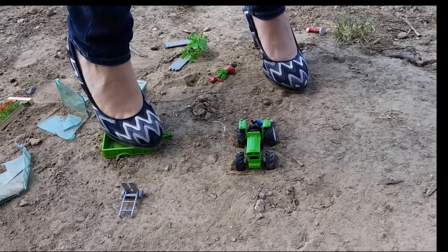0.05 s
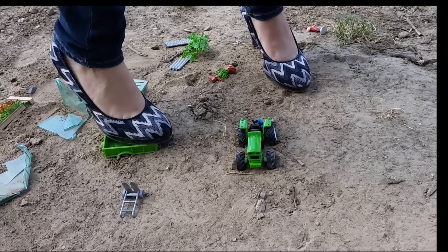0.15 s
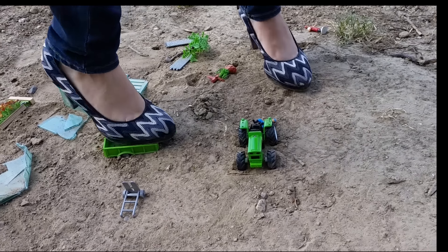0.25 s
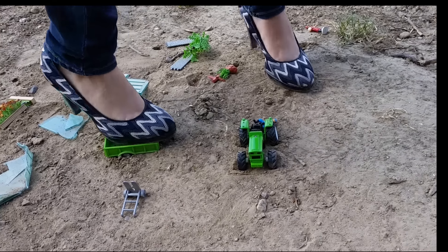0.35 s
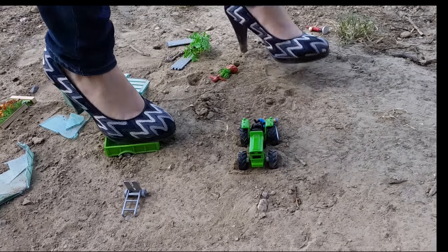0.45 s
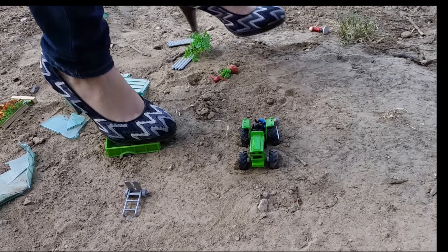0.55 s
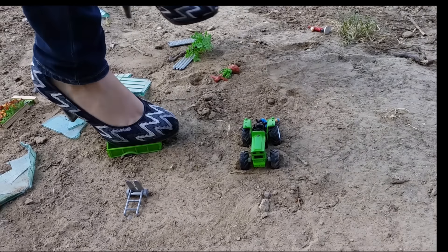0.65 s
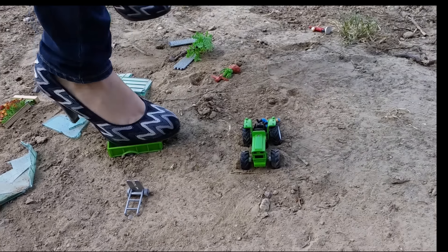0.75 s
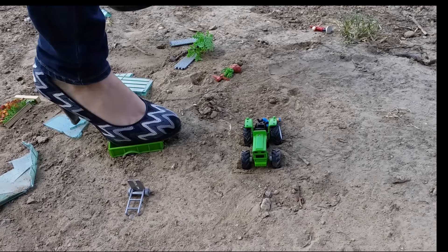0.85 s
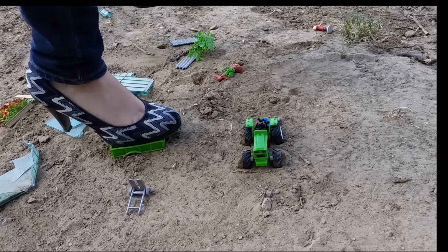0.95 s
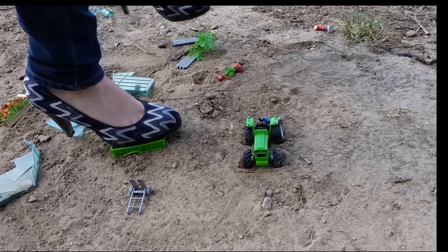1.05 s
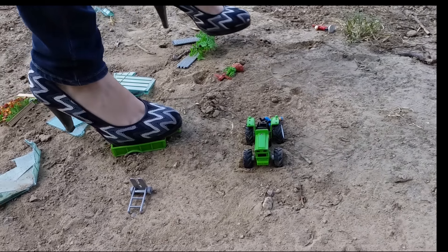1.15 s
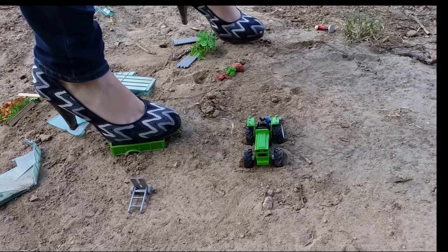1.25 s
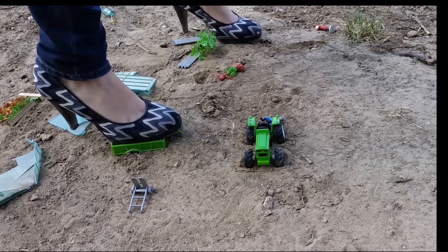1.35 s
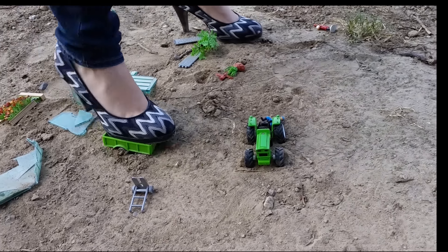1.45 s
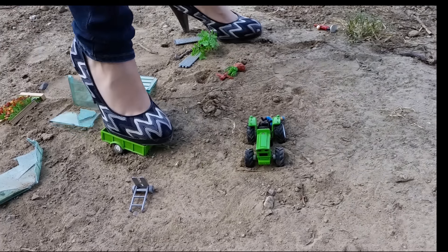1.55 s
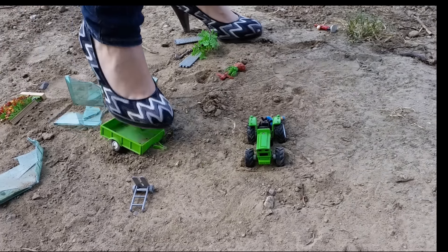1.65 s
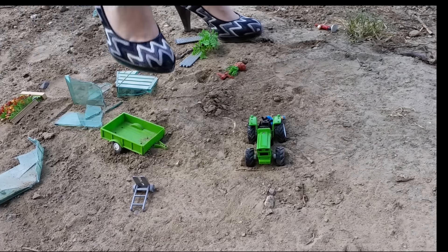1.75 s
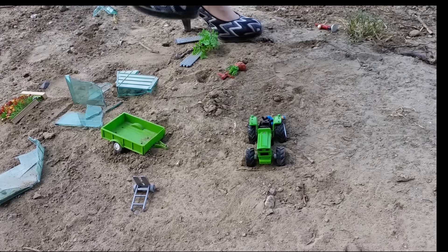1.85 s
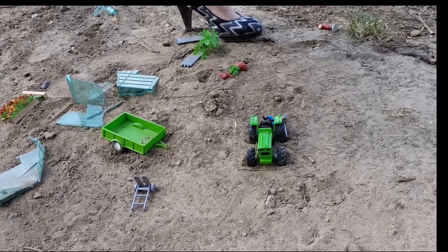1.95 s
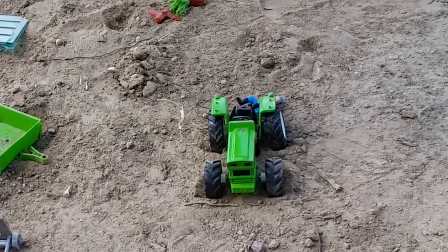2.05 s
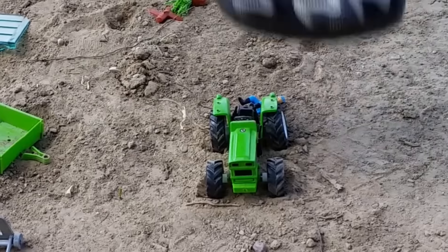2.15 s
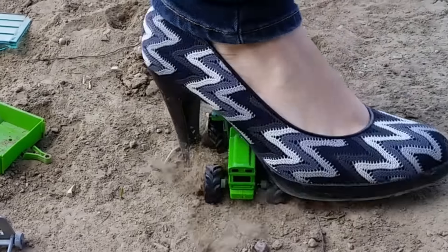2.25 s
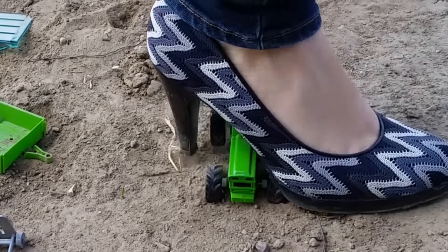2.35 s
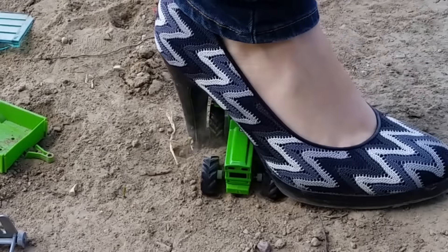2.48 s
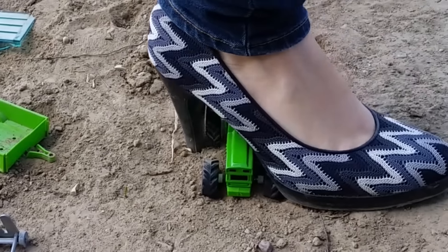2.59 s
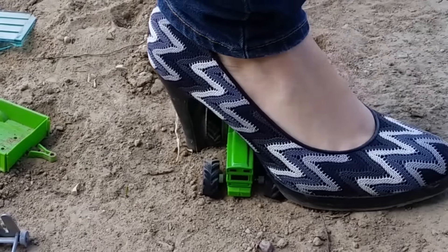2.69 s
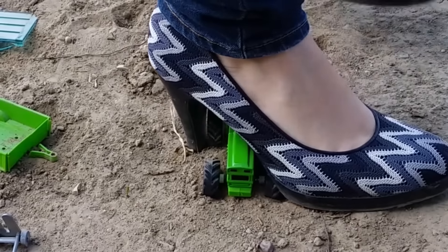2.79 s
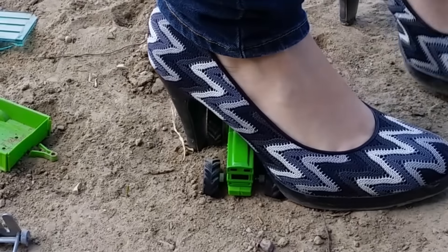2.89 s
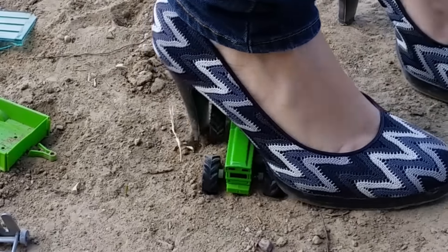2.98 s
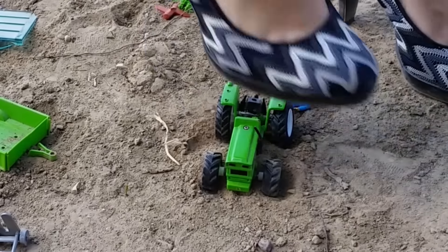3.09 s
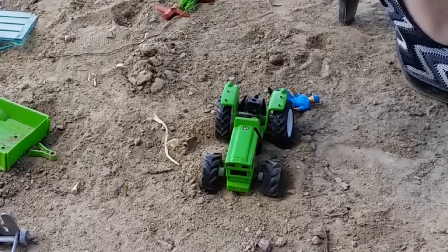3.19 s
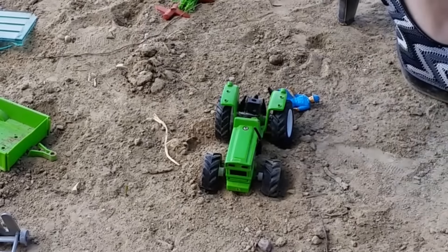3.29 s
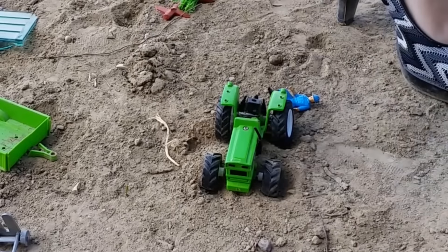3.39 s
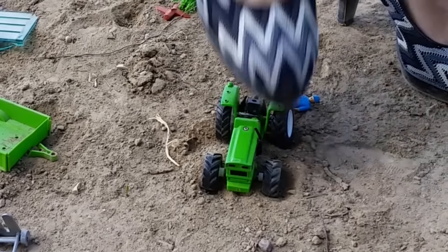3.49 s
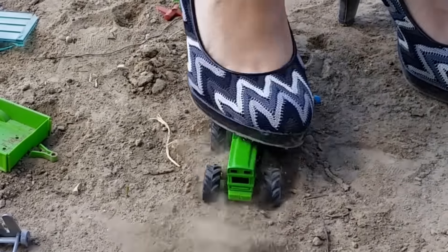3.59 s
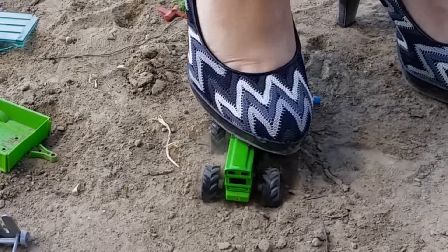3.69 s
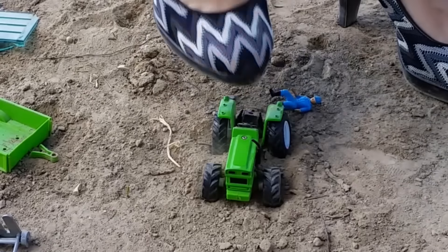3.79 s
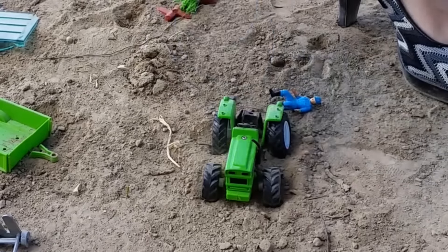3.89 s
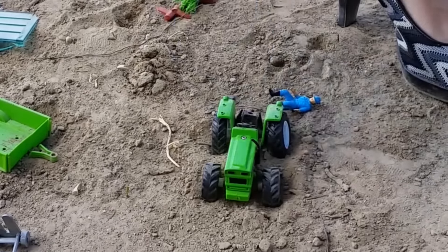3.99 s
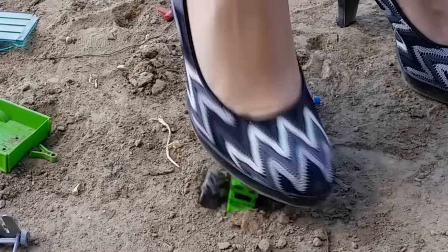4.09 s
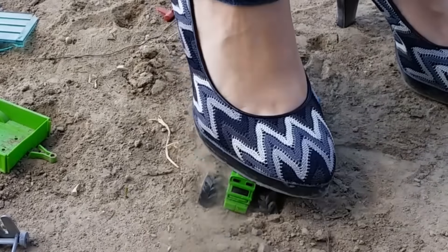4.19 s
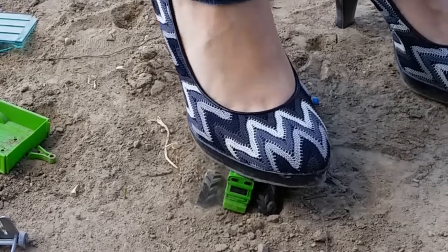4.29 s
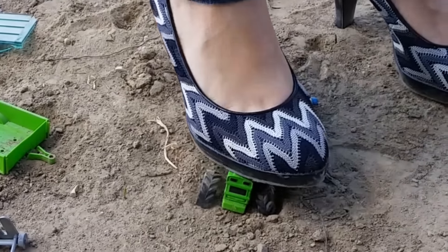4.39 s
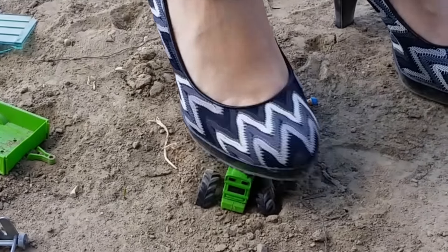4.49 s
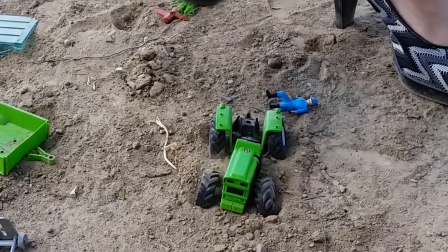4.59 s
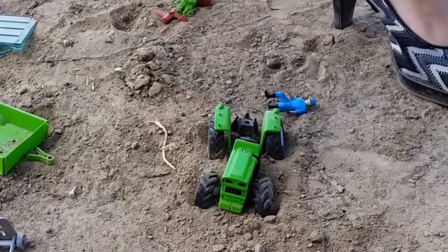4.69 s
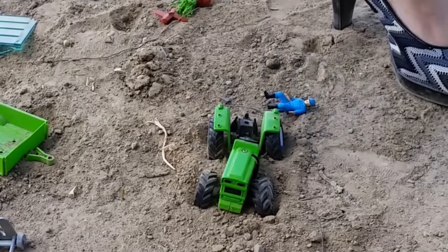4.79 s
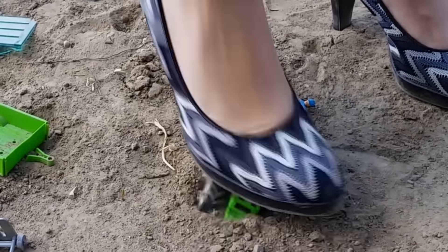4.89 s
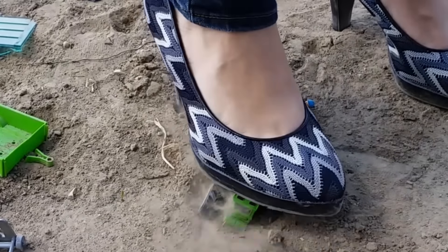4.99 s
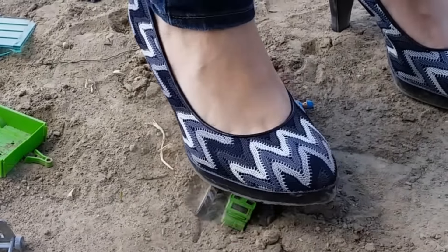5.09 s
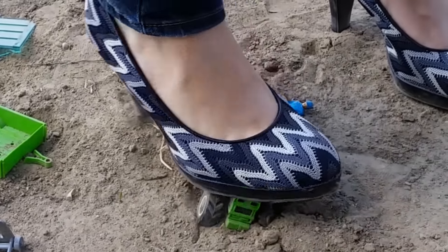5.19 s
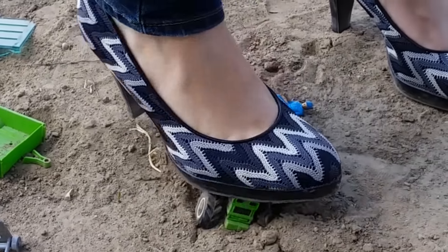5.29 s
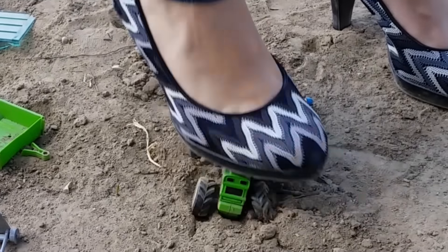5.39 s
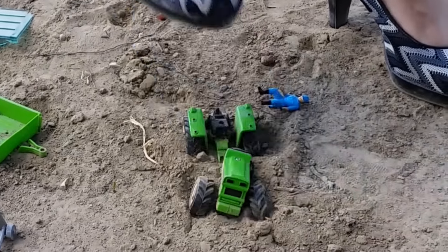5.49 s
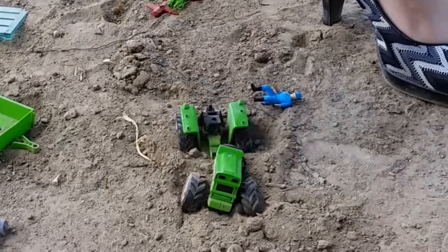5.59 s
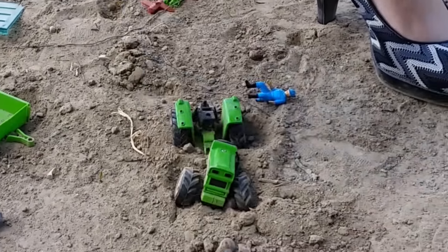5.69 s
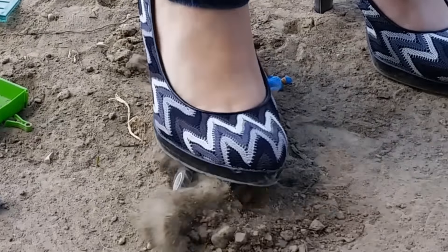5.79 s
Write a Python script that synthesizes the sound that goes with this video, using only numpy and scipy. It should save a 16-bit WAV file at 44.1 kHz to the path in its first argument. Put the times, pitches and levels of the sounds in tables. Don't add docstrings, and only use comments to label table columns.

```python
import sys
import numpy as np
from scipy import signal
from scipy.io import wavfile
from scipy.ndimage import uniform_filter1d

SR = 44100
rng = np.random.default_rng(int(sys.argv[2]) if len(sys.argv) > 2 else 0)


def field_ratio(decibels):
    return 10 ** (np.asarray(decibels, dtype=float) / 20)


def digitize_waveform(pressure):
    field = np.atleast_2d(pressure).T
    bounded = np.clip(field, -1, 1)
    quanta = np.round(bounded * 32767).astype(np.int16)
    wavfile.write(sys.argv[1], SR, quanta)


N = 257720

# t/s, peak level/dB, f/Hz, t60/s, knock of the sole/dB
STAMPS = [
    (1.6, -13.5, 170, 0.021, -35.5),
    (1.735, -53, 266, 0.034, -32),
    (2.322, -20.5, 350, 0.025, -18),
    (2.334, -9.5, 260, 0.033, -23),
    (3.0246, -9, 203, 0.023, -47),
    (3.629, -14.5, 159, 0.027, -17),
    (3.642, -26, 382, 0.065, -28),
    (4.2148, -7, 162.4, 0.027, -19.5),
    (5.016, -18.5, 158, 0.038, -28.5),
    (5.029, -23.5, 120, 0.061, -62),
]
# f/Hz, width/Hz, level/dB
SOLE_MODES = [(440, 140, -1.5), (673, 50, -8)]
# t/s, peak level/dB, f/Hz, t60/s
BLOWS = [(.689, -32.5, 1340, 0.028), (.999, -41, 1300, 0.061), (1.008, -40, 1300, .07),
         (1.0302, -34, 1300, 0.043), (1.043, -33, 1350, .04), (1.059, -35, 306, .025),
         (1.392, -38, 240, 0.03), (1.504, -41, 1270, .04), (1.522, -39, 1140, 0.071),
         (2.3295, -24.5, 870, 0.033), (2.355, -31.5, 1270, 0.023), (3.6294, -16, 737, 0.0087),
         (3.6335, -23.5, 940, 0.012), (3.643, -19, 520, .022), (3.651, -22.5, 270, 0.043),
         (4.2154, -15.5, 930, 0.0051), (4.2205, -25.5, 800, 0.011), (4.2277, -22, 1340, 0.0053),
         (4.282, -32, 600, 0.025), (3.1378, -27.5, 1810, 0.018), (3.1385, -31, 2400, .013),
         (3.1374, -26.5, 3030, 0.012), (2.8, -36, 1830, 0.012), (1.7345, -33, 1700, 0.016),
         (1.742, -29, 2380, .02), (3.9, -57, 900, 0.019), (4.2352, -27, 1100, 0.011),
         (1.0305, -38, 2200, .025), (3.630, -24, 1840, 0.035), (2.3245, -20, 1780, .012),
         (5.0165, -26, 767, 0.019), (5.0188, -23, 486, 0.025)]
# t/s, level/dB, shard f/Hz, body over shard/dB, length/ms
CRUNCHES = [(0.2038, -55, 6450, -8, 1.9), (0.2161, -50, 6900, 0, 3.7), (0.6767, -47.5, 2500, 1.5, 4.9),
            (0.688, -47.5, 5900, -4, 3.3), (1.103, -54.5, 2930, 5.5, 1.8), (1.1084, -53, 2670, -2, 1.4),
            (1.1117, -54, 6540, -7, 3), (1.362, -59.5, 2450, -2, 4.5), (1.65, -57, 2400, 4, 6.4),
            (1.7065, -57, 2070, 13.5, 12), (1.889, -57.5, 2420, -14, 4.4), (3.813, -67, 8000, -5, 2.2),
            (4.227, -32.5, 1820, -5, 3.3), (4.2349, -24.5, 3180, -12.5, 2.4), (4.471, -77, 1940, -5, 1.8),
            (4.5651, -66.5, 5350, -3.5, 2.8), (5.0247, -43.5, 3580, -14, 2.4),
            (5.047, -52.5, 5320, -17, 1.8)]
SNAPS = [(1.0283, -47.5, 4060, 17.5, 2.5), (1.045, -50, 3200, -15, 9.4), (1.08, -61, 3320, 10, 9.6),
         (1.1179, -49.5, 2700, -2, 2.2), (1.5041, -57, 2240, 6, 14), (1.7328, -41, 2020, 6, 6.5),
         (1.742, -34.5, 2380, 0, 6), (2.3337, -28.5, 1780, -4.5, 7), (2.336, -26.5, 2710, -24, 3.4),
         (2.5974, -56, 2420, -4, 3.2), (2.665, -51, 1840, -8, 6), (3.0248, -41.5, 2670, -3.5, 2.7),
         (3.6283, -25, 1860, -1.5, 5.7), (3.6406, -25.5, 1840, -29, 2.3), (3.646, -26.5, 4620, -11, 2.3),
         (3.675, -35, 3470, -9.5, 2.3), (3.7814, -52.5, 3550, -0.5, 4), (3.848, -58.5, 3800, 3.5, 6.1),
         (4.2154, -28.5, 2300, 2, 2.07), (4.221, -30, 2310, -17, 3.3), (4.619, -47.5, 4180, -25, 8.5),
         (4.646, -47.5, 5170, -25, 2.4), (5.0169, -43, 1850, 0.5, 4.3), (5.2716, -72, 7300, -1.5, 6)]
CLICKS = [(1.03, -39, 2610, 2, 7), (1.307, -48, 2605, -20, 17), (1.755, -46, 2000, -9, 4),
          (1.8165, -44, 3400, -25, 0.85), (2.3156, -37, 4130, -21, 5.7), (2.3251, -26.5, 1910, 2, 1.57),
          (2.3271, -30, 2010, 4, 5.2), (2.5026, -52.5, 2370, -4, 1.4), (2.5426, -51, 2470, 0, 1.4),
          (3.1356, -43, 2380, -22, 1.8), (3.6423, -29, 4050, -6, 1.8)]
# fizz over shard/dB, share of unringing crack
BREAK_KINDS = [
    (2.5, 0.43),
    (-5, 0.39),
    (-20.0, 0.15),
]
# f/Hz, width/Hz, level/dB
TOY_MODES = [(923, 190, -10.5), (1280, 93, 0), (1728, 91, 0)]
# t/s, level/dB, first f/Hz, second f/Hz, length/ms
CHIPS = [(.2175, -42, 10300, 6350, 4), (.678, -48, 6300, 12500, 7.7), (.6885, -39, 6300, 12700, 4.6),
         (1.082, -54, 12000, 14500, 3), (1.103, -52, 13500, 6300, 2), (1.1075, -49, 14500, 11000, 2.5),
         (1.1125, -52, 14500, 6300, 2.5), (1.118, -55, 14000, 6500, 3), (1.571, -54, 13500, 6900, 57),
         (1.613, -44, 14500, 12000, 11), (1.65, -52, 14600, 11500, 4), (1.707, -54, 11000, 14000, 2.2),
         (1.7355, -37, 11000, 13000, 3.5), (1.7425, -44, 14500, 11000, 4), (1.753, -44, 11000, 14000, 5),
         (1.817, -48, 13000, 3320, 3.4), (1.866, -58, 11000, 14100, 3), (2.406, -51, 8000, 12000, 3),
         (2.514, -59, 6500, 4500, 2.2), (2.541, -57, 7600, 9500, 3), (2.571, -56, 7500, 9900, 4.3),
         (2.66, -62, 10000, 13500, 2.7), (2.866, -62.5, 13500, 10600, 3), (3.131, -59, 7900, 3100, 3),
         (3.144, -57, 7800, 7400, 3), (3.642, -30.5, 11800, 7900, 7.4), (3.782, -54, 15000, 13000, 2.2),
         (3.813, -46.5, 7950, 11600, 3.7), (3.845, -61, 7350, 12000, 21), (4.621, -47.5, 9340, 7340, 8.6),
         (4.622, -54.5, 5500, 13000, 10), (1.305, -54, 14400, 6450, 14), (4.2349, -32.5, 7400, 9800, 3.2),
         (4.2215, -38, 9480, 12000, 2.5), (4.2155, -39.5, 7500, 9500, 2.5), (4.646, -46, 7230, 5440, 3.4)]
# t/s, level/dB, f/Hz, t60/s, left over right/dB
RINGS = [(1.43, -35, 485, 0.038, 1), (1.5, -43, 474, 0.092, -1), (1.755, -42.5, 1383, 0.14, -25),
         (1.69, -42.5, 256.8, 0.47, 21), (4.272, -41.5, 592, 0.044, 5.5), (4.595, -55.5, 454, 0.088, 2.5),
         (5.26, -41.5, 334, 0.044, 0.5)]
# t/s, level/dB
DRAGS = [
    [(.96, -67), (1.01, -50), (1.024, -50), (1.033, -46), (1.05, -38), (1.062, -68)],
    [(1.49, -58), (1.505, -55), (1.518, -53), (1.535, -41), (1.58, -35), (1.595, -38), (1.62, -42.5),
     (1.645, -52)],
]
# f/Hz, width/Hz, level/dB
TRAILER_MODES = [(700, 310, 0.5), (1226, 80, 11), (1380, 120, -2), (1850, 180, -10), (2370, 140, -0.5),
                 (3080, 160, -11)]
# t/s, rise/s, grit level/dB, fizz over grit/dB, t60/s
SAND = [(.12, 0.055, -64, -1, 1.6), (.29, 0.067, -74, 2, 1.3), (.635, 0.012, -66, -2, 0.94),
        (.73, 0.0089, -63.5, -2, 0.45), (1.025, 0.0026, -48.5, -4.5, 0.29), (1.09, 0.0068, -63, -3, 0.85),
        (1.285, 0.012, -53, -2.5, 0.2), (1.33, 0.06, -70, 0, 6.7), (1.49, 0.09, -53.5, 5, 0.27),
        (1.728, 0.0043, -51, -5, 0.6), (2.323, 0.0021, -36, -5.5, 0.17), (2.4, 0.0061, -54.5, -6, 0.65),
        (2.52, 0.014, -54.5, -6.5, 0.81), (3.04, 0.062, -59.5, -5, 0.28), (3.629, 0.0022, -40, -7, 0.34),
        (3.8, 0.045, -59.5, -4, 0.3), (4.24, 0.015, -44, -5, 0.27), (4.648, 0.0046, -73, -8, 0.33),
        (5.02, 0.0053, -68, -9.5, 0.51)]
# f/Hz, width/Hz, level/dB
PEBBLE_MODES = [(7770, 500, 0.5), (10570, 630, 0.5)]
LEADS = 6, 3
MOVE_S = 2.1
# t/s, level/dB, lean to the left port/dB
WIND = [(0.0, -47, -1), (0.32, -47, -2.5), (0.62, -38.5, 10.5), (0.85, -43.5, -4.5), (1.12, -39.5, 10.5),
        (1.3, -44.5, -2.5), (1.55, -37.5, 12.5), (1.8, -38, 0), (2.2, -37.5, 11), (2.5, -38, 7),
        (2.9, -38, 11), (3.201, -31.5, 1), (3.4, -37, 7.5), (3.7, -37, 10.5), (4.15, -40, 6),
        (4.6, -44, 5.5), (4.85, -55, 3.5), (5.6, -49, 3)]
# f/Hz, level per Hz/dB
WIND_COLOUR = [(12, -39), (20, -4.5), (75, 2.5), (139, -5.5), (220, -12), (300, -25), (500, -38.5),
               (700, -61)]
# t of the turn from crest to trough/s, peak level/dB, f/Hz
EDDIES_LEFT = [(0.58, -12.5, 122), (0.598, -17.5, 126), (1.468, -23, 86.4), (1.686, -23, 136),
               (2.118, -26.5, 96), (2.275, -23.5, 100.4), (2.355, -16, 122), (2.589, -26.5, 89),
               (2.618, -23, 156), (2.839, -19, 119), (2.862, -19, 146), (2.896, -22, 102),
               (2.975, -18, 103), (3.15, -6, 109), (3.175, -18, 87), (3.225, -21, 115), (3.275, -14, 115),
               (3.318, -16, 104), (3.331, -16, 113), (3.744, -13.5, 116), (3.783, -19.5, 112),
               (3.798, -24.5, 82.3), (3.887, -18, 103), (3.901, -14.5, 135), (3.93, -4, 123),
               (3.949, -12.5, 85.6), (3.969, -15, 91), (4.256, -18, 79), (4.269, -19.5, 151),
               (4.285, -14.5, 143)]
# t of the turn from crest to trough/s, peak level/dB, f/Hz
EDDIES_RIGHT = [(1.854, -28, 87), (2.15, -20, 91), (2.172, -25, 76.4), (2.566, -28.5, 89.5),
                (2.616, -20.5, 89), (2.65, -23, 87), (3.127, -23.5, 122), (3.135, -19, 112),
                (3.149, -22.5, 98), (3.26, -20.5, 148), (3.67, -30, 99), (3.965, -29.5, 65),
                (4.139, -25.5, 73), (4.153, -27, 69), (4.376, -29, 108.7)]
EDDY_CYCLES, CYCLES_PER_DB = 0.57, 0.1848
# t/s, roar level/dB
ROAD = [(0.0, -68.5), (0.5, -59.5), (1.76, -57.5), (2.6, -56), (4.15, -58), (4.42, -69.5), (4.95, -80),
        (5.3, -72), (5.84, -64)]
ROAD_FULL_DB = -57
# f/Hz, level per Hz/dB
ROAR_COLOUR = [(150, -6), (300, 0), (500, -3.5), (950, -3), (1400, -8.5), (2100, -24), (3000, -30)]
# f/Hz, level per Hz/dB
TYRE_COLOUR = [(1200, -26), (1900, 2), (3000, -2.5), (3900, 3.5), (4500, -5), (5000, -28.5), (6000, -53)]
# f/Hz, level per Hz/dB
AIR_COLOUR = [(3500, -34), (5000, 1.5), (8600, -15.5), (13000, -3), (15500, 1), (16000, -31)]
# level over full roar/dB, share of the swell, left over right/dB
FOLLOW = [
    (0, 1.024, 5),
    (-11, 1.3, 2.5),
    (-20, 0.75, -1.7),
]
# f/Hz, width/Hz, depth/dB
PORT_DIPS = [(5610, 2400, -7), (15800, 4400, -5.5)]


def evened(x):
    return x / np.sqrt(np.mean(x ** 2) + 1e-20)


def add(mix, s, sound):
    part = mix[..., max(round(s * SR), 0):][..., :sound.shape[-1]]
    part += sound[..., :part.shape[-1]]


def band(x, lo_hz, hi_hz):
    return signal.sosfilt(signal.butter(3, [lo_hz, min(hi_hz, 20000)], "bandpass", fs=SR, output="sos"), x)


def resonate(x, modes, shift=1):
    total = 0
    for hz, width, db in modes:
        total = total + field_ratio(db) * signal.lfilter(*signal.iirpeak(hz * shift, hz / max(width, 10), SR), x)
    return total


def balance(pan_db):
    return field_ratio(np.array([[pan_db / 2], [-pan_db / 2]]))


def ports(x, pan_db, loose=0.17):
    scatter = rng.standard_normal((2, 90)) * field_ratio(-np.arange(90) * .35)
    scatter *= loose / np.linalg.norm(scatter[0])
    scatter[:, 0] = 1
    return signal.fftconvolve(x[None], scatter, axes=1)[:, :len(x)] * balance(pan_db)


def grains(count, per_s, spread_db):
    sizes = field_ratio(spread_db * np.minimum(rng.exponential(1, count), 4))
    return evened(sizes * rng.standard_normal(count) * (rng.random(count) < per_s / SR))


def stamp(db, hz, t60, knock_db):
    t = np.arange(0, .12, 1 / SR)
    push = -np.sin(2 * np.pi * hz * t * (1 - 2.0 * t))
    push = push * field_ratio(db - 60 * t / t60) * (1 - np.exp(-(t / 0.002) ** 2))
    burst = field_ratio(-60 * t / 0.043) * (1 - np.exp(-t / 0.0033))
    blows = band(grains(len(t), 1500, 0.89) * burst, 220, 790)
    knock = resonate(blows, SOLE_MODES, rng.uniform(1.0, 1.04)) + 0.25 * blows
    knock = field_ratio(knock_db + 2.0) * knock / abs(knock).max()
    return ports(push, 0, loose=0) + ports(knock, 1.8, loose=0.25)


def blow(db, hz, t60):
    t = np.arange(0, .08, 1 / SR)
    return ports(-np.sin(2 * np.pi * hz * t) * field_ratio(db - 60 * t / t60), 1.7, loose=.15)


def snap(db, hz, body_db, ms, fizz_db, broad):
    t = np.arange(0, .06, 1 / SR)
    burst = np.exp(-(t / (ms / 800)) ** 3) + 0.13 * np.exp(-t / 0.011)
    onset = 1 - np.exp(-t / (ms ** 2 / 40000))
    crack = grains(len(t), 12000, 2.1) * burst * onset
    crack[6] += 30 / ms ** 2
    shard = resonate(crack, [(hz, .16 * hz, 0), (1.65 * hz, .3 * hz, -5)])
    shard = band(shard, .7 * hz, 2.01 * hz) + broad * band(crack, 1300, 7500)
    body = resonate(band(crack, 850, 1650), TOY_MODES, rng.uniform(1.0, 1.04))
    fizz = band(crack, 6100, 18000)
    total = 0
    for part, pan_db, over_db in ((shard, .6, 0), (body, 2.5, body_db), (fizz, -1.5, fizz_db)):
        x = ports(part, pan_db, loose=0.75)
        total = total + field_ratio(db + over_db) * x * np.sqrt(0.012 * SR) / np.linalg.norm(x)
    return total


def chip(db, hz, second_hz, ms):
    t = np.arange(0, .08, 1 / SR)
    rattle = grains(len(t), 15000, 1.3) * np.exp(-(t / (ms / 1000)) ** 4) * (1 - np.exp(-t / 0.00035))
    rattle[8] += 12 / ms
    width = .11
    modes = [(hz, width * hz, 0), (second_hz, width * second_hz, -2.5)]
    x = ports(resonate(rattle, modes) + .1 * band(rattle, 4000, 16000), -1.5, loose=.45)
    return field_ratio(db) * x * np.sqrt(ms / 500 * SR) / np.linalg.norm(x)


def ring(db, hz, t60, pan_db):
    t = np.arange(0, .3, 1 / SR)
    rattle = 1 + .6 * evened(uniform_filter1d(rng.standard_normal(len(t)), size=300))
    fade = field_ratio(db - 60 * t / t60) * (1 - np.exp(-t / 0.0025))
    return ports(rattle * np.sin(2 * np.pi * hz * t) * fade, pan_db, loose=0)


def drag(rows):
    s, db = np.transpose(rows)
    t = np.arange(s[0], s[-1], 1 / SR)
    grit = signal.lfilter(*signal.butter(1, [480, 3000], "bandpass", fs=SR), grains(len(t), 3500, 2.9))
    hollow = evened(resonate(grit, TRAILER_MODES)) + 0.29 * evened(band(grit, 490, 3100))
    level = field_ratio(np.interp(t, s, db)) * signal.windows.tukey(len(t), .15)
    return s[0], ports(evened(hollow) * level, 1.3, loose=0.54)


def sand(rise, db, fizz_db, t60):
    t = np.arange(0, .5, 1 / SR)
    hold_s = 0.015
    level = np.clip(t / rise, 0, 1) ** 2 * field_ratio(db - 60 * np.maximum(t - rise - hold_s, 0) / t60)
    shared, left, right = [grains(len(t), 14000, 3.0) for _ in range(3)]
    grit = shared + 2.3 * np.array([left, right])
    fizz = 1.2 * band(grit, 6400, 15000) + resonate(grit, PEBBLE_MODES)
    return level * (evened(band(grit, 1800, 6500)) + field_ratio(fizz_db) * evened(fizz))


def noise(colour, same, patchy_db, size):
    hop, hz = size // 4, np.fft.rfftfreq(size, 1 / SR)
    a, b, c, d, patches = rng.standard_normal((N // hop + 5, len(hz), 5)).T
    patches = evened(uniform_filter1d(uniform_filter1d(patches, 10, 0), 10, 1))
    left = a + 1j * b
    right = same * left + np.sqrt(1 - same ** 2) * (c + 1j * d)
    f, db = np.transpose(colour)
    shape_db = np.interp(np.log(hz + 1), np.log(f + 1), db, left=-60, right=-80)
    z = np.array([left, right]) * field_ratio(shape_db[:, None] + patchy_db * patches)
    return evened(signal.istft(z, nperseg=size, noverlap=size - hop)[1][:, :N])


def eddy(t, db, hz):
    turn = 2 * np.pi * hz * t * (1 - 22.0 * t)
    length = (EDDY_CYCLES - CYCLES_PER_DB * db) / hz
    return field_ratio(db) * np.exp(-(t / (0.3 * length)) ** 2) * (0.2 * np.sin(2 * turn) - np.sin(turn))


def wind():
    s, level_db, lean_db = np.transpose(WIND)
    lumps = signal.resample(rng.standard_normal((2, 150)), N, axis=1)
    rumble = noise(WIND_COLOUR, 0.16, 1.9, size=4096) * field_ratio(2.3 * lumps)
    out = np.zeros((2, N))
    t = np.arange(-.06, .06, 1 / SR)
    for port, (side, eddies) in enumerate(((.5, EDDIES_LEFT), (-.5, EDDIES_RIGHT))):
        out[port] = evened(rumble[port]) * field_ratio(np.interp(np.arange(N) / SR, s, level_db + side * lean_db))
        for middle_s, db, hz in eddies:
            add(out[port], middle_s + t[0], eddy(t, db, hz))
    return out


def road():
    swell_db = np.interp(np.arange(N) / SR, *np.transpose(ROAD)) - ROAD_FULL_DB
    roar = noise(ROAR_COLOUR, .35, 1.5, size=1024)
    tyres = noise(TYRE_COLOUR, .15, 1.2, size=1024)
    air = noise(AIR_COLOUR, .05, 1.6, size=512)
    total = 0
    for x, (db, share, pan_db) in zip((roar, tyres, air), FOLLOW):
        level_db = ROAD_FULL_DB + 4.0 + db + share * swell_db
        total = total + x * field_ratio(level_db) * balance(pan_db)
    return total


def scene():
    shoe = np.zeros((2, N))
    sources = (STAMPS, stamp), (BLOWS, blow), (CHIPS, chip), (RINGS, ring), (SAND, sand)
    for table, source in sources:
        for s, *row in table:
            add(shoe, s, source(*row))
    for table, kind in zip((CRUNCHES, SNAPS, CLICKS), BREAK_KINDS):
        for s, *row in table:
            add(shoe, s, snap(*row, *kind))
    for rows in DRAGS:
        add(shoe, *drag(rows))
    on_left, on_middle = [np.roll(shoe[1], lead) for lead in LEADS]
    shoe[1] = np.where(np.arange(N) < MOVE_S * SR, on_left, on_middle)
    return shoe + wind() + road()


def low_pass(x):
    return signal.sosfilt(signal.butter(12, 16680, fs=SR, output="sos"), x)


def record(dry):
    for hz, width, db in PORT_DIPS:
        dry = dry + (field_ratio(db) - 1) * signal.lfilter(*signal.iirpeak(hz, hz / width, SR), dry)
    limit = .88 * signal.firwin(511, 15850, fs=SR) + .12 * signal.firwin(511, 16600, fs=SR)
    dry = signal.oaconvolve(dry, limit[None], "same")
    mix = signal.lfilter(*signal.butter(1, 22, "high", fs=SR), dry)
    return low_pass(mix)


dry = scene()
out = record(dry)
digitize_waveform(out)
```